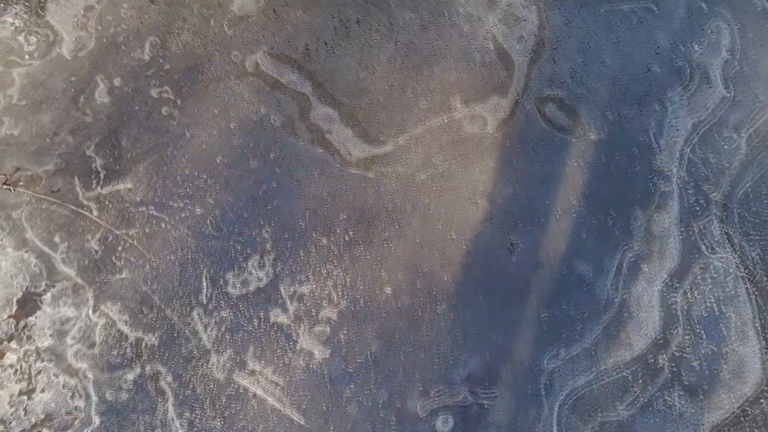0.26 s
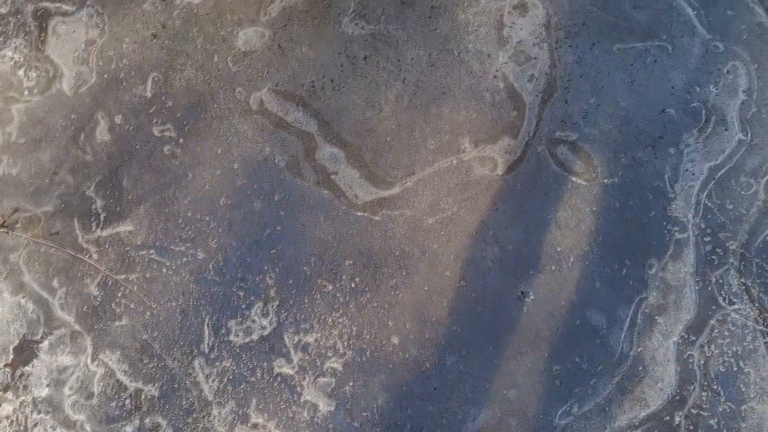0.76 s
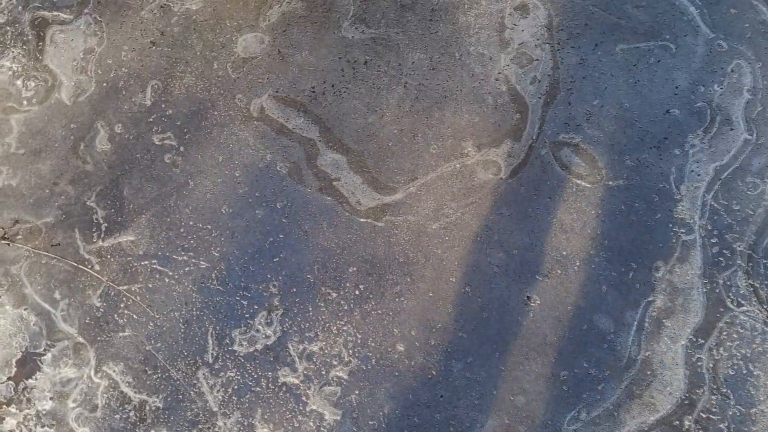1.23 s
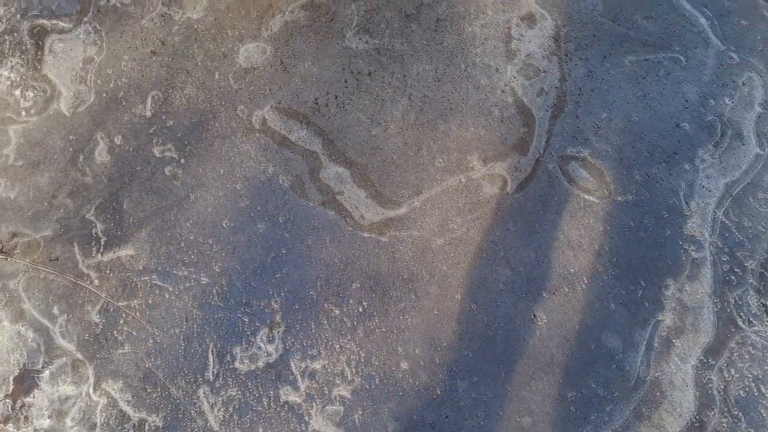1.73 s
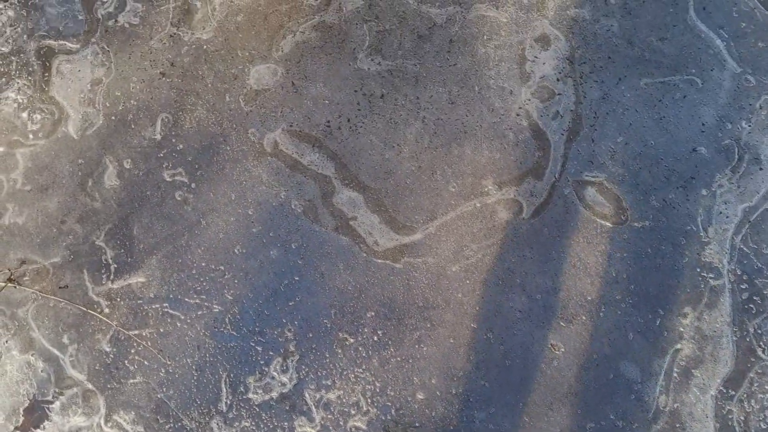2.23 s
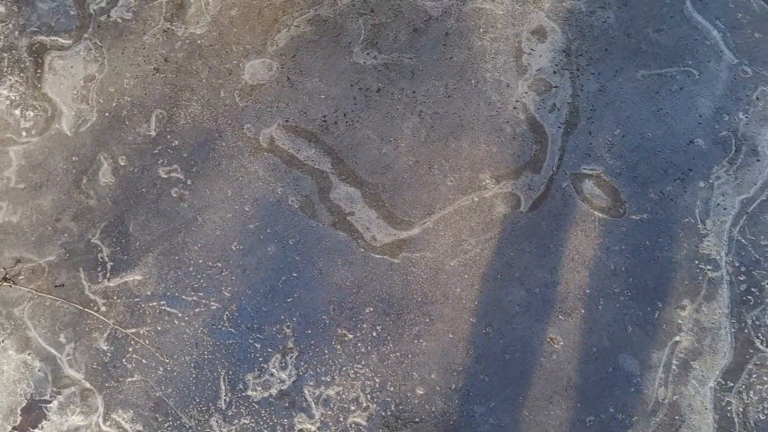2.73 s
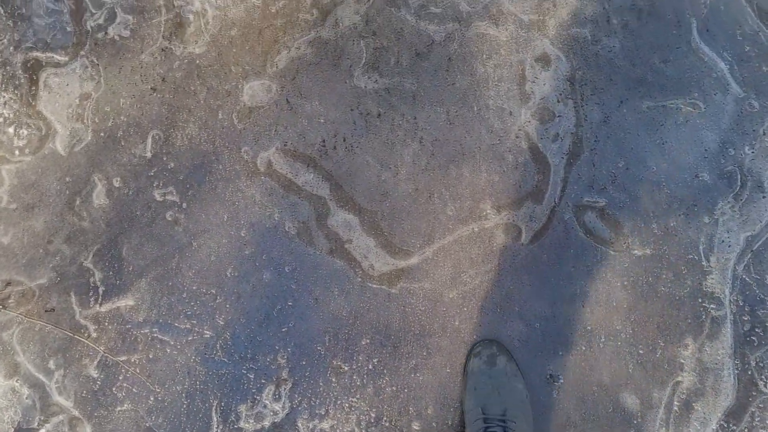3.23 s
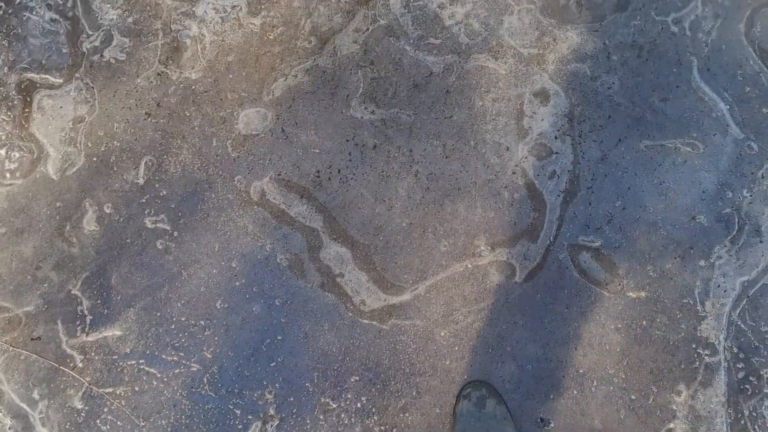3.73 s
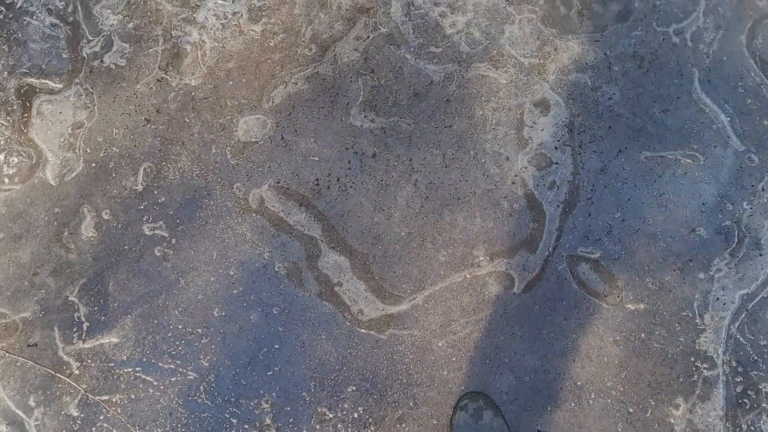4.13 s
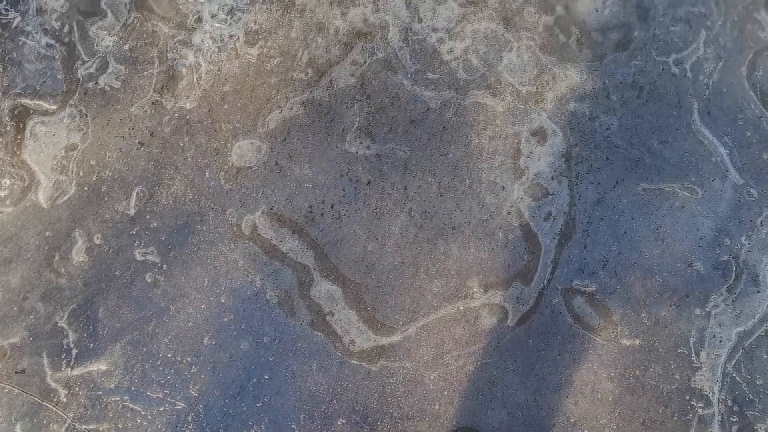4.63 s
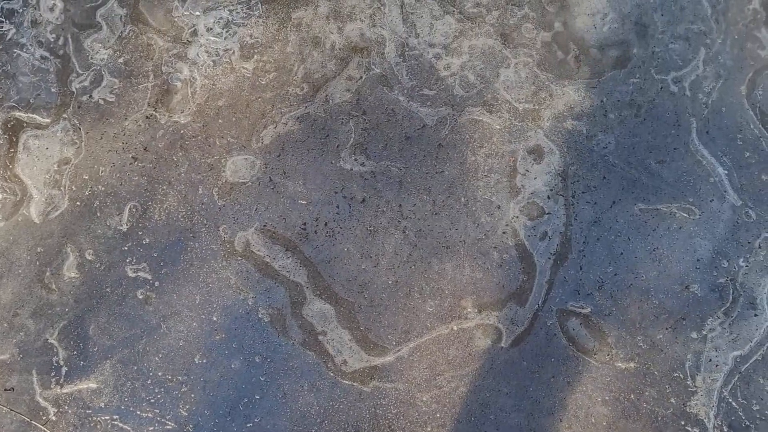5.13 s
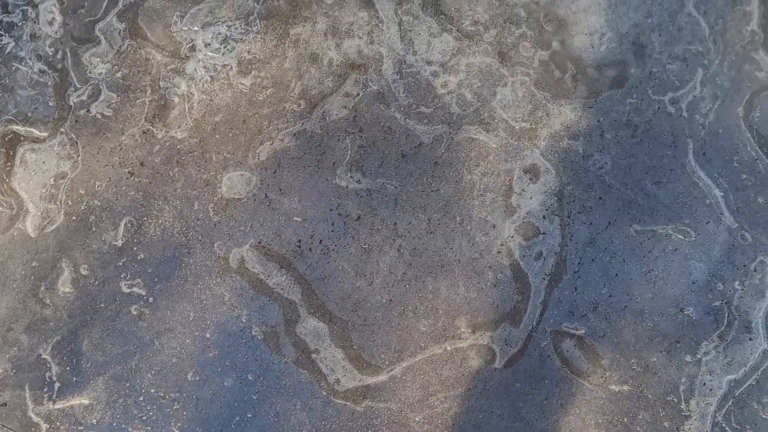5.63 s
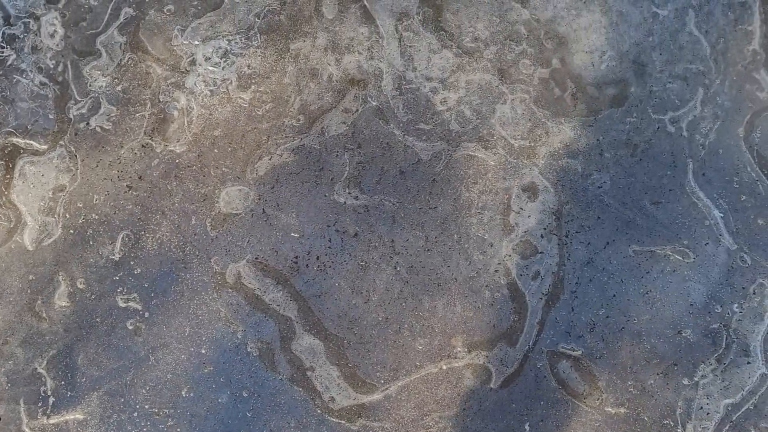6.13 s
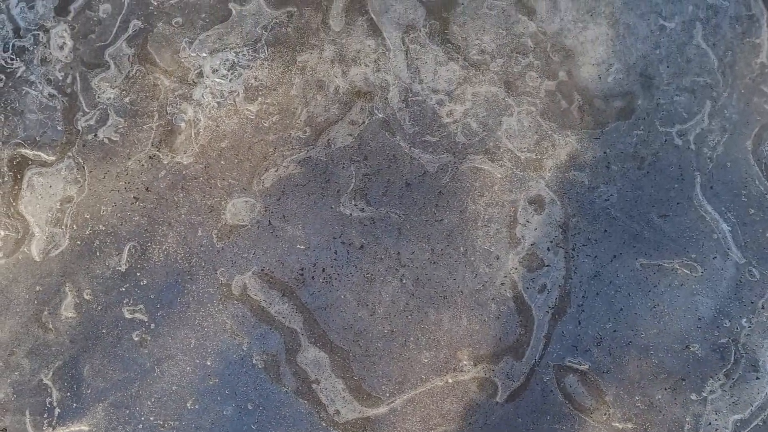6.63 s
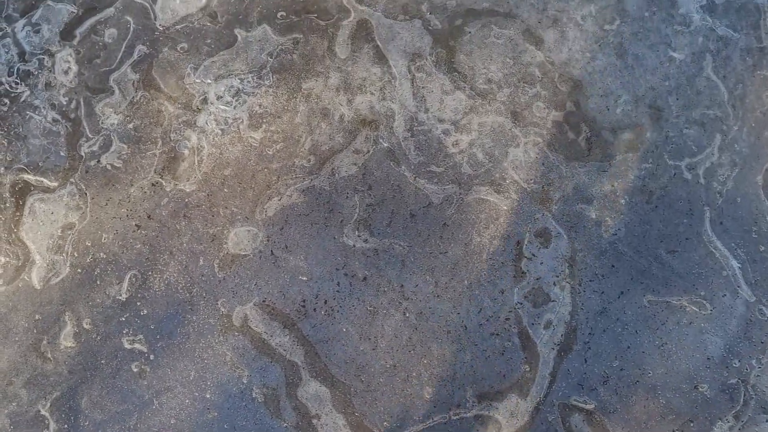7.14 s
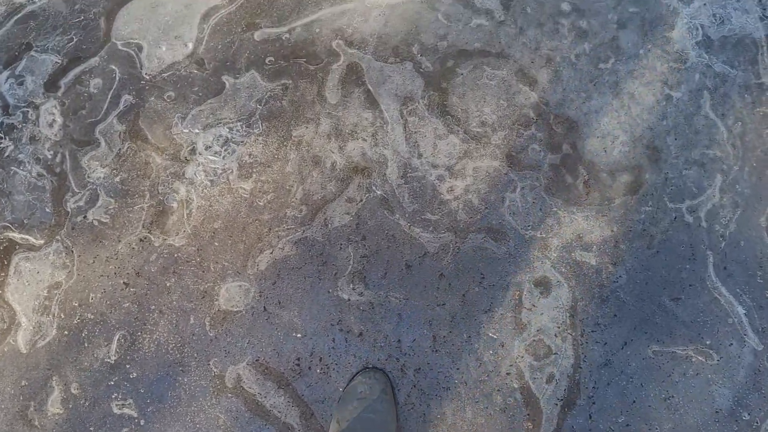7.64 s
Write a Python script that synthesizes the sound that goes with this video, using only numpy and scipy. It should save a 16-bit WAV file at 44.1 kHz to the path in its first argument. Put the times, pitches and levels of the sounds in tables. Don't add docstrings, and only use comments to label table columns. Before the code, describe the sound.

Close to a hand-held phone outdoors, a boot breaks thin puddle ice. Sparse ticks and soft low creaks come first, then a sharp cluster at two seconds and a stronger, louder one just after three. A quiet gap follows, then longer crackling and grinding from the middle onward, one last heavy break near seven seconds, and fading small ticks. Faint far traffic rumbles beneath.

```python
import sys
import numpy as np
from scipy import signal
from scipy.fft import rfft, irfft
from scipy.io import wavfile
from scipy.ndimage import uniform_filter1d

SR = 44100
rng = np.random.default_rng(int(sys.argv[2]) if len(sys.argv) > 2 else 0)


def put_to_file(sound):
    columns = np.atleast_2d(sound).T
    safe = np.clip(columns, -1, 1)
    whole_steps = np.round(safe * 32767)
    wavfile.write(sys.argv[1], SR, whole_steps.astype(np.int16))


def boost(x):
    u = np.asarray(x, float) / 20
    return 10 ** u


N = 347067

# start in seconds, crack peak in dB, thud in dB re crack,
# snap in dB re crack, knock in Hz.
TOE_BREAKS = [(0.767, -46, 11, -9, 640), (0.8987, -22.5, -1.5, -6.5, 450), (1.0809, -43.5, 12, -1.5, 345),
              (1.777, -60.5, 15, -10.5, 540), (2.0054, -20, -2.5, -1, 402), (2.0725, -32.5, -2, -7.5, 630),
              (2.1335, -23, 0.5, -7, 666), (2.1466, -32, -16.5, -7, 440), (2.167, -19.5, -4, -4, 620),
              (2.1887, -26.5, -5, -0.5, 560), (2.1998, -27.5, -7.5, -6.5, 560)]
STAMP_BREAKS = [(2.8458, -28, -2, -2, 700), (2.847, -45, 9.5, -14.5, 1040), (3.0416, -39, 4.5, -6, 221),
                (3.094, -14, -12.5, -12, 1290), (3.174, -21.5, -6, -8.5, 1470),
                (3.2424, -24.5, -6.5, -3, 240), (3.261, -20.5, -8, -3.5, 577), (3.2913, -15, -1, -9.5, 598),
                (3.3254, -44, -8, 7.5, 1490), (3.3341, -19, -5, -14, 551), (3.3428, -24, -3, -1.5, 453),
                (3.371, -32, -7.5, -3.5, 403), (3.405, -22.5, -3.5, -9, 560), (3.4279, -32, 1, -4, 540),
                (3.44, -14.5, -4.5, -7.5, 630), (3.505, -25.5, -6, -3.5, 553),
                (3.5224, -30.5, -26, -6.5, 1500), (3.606, -22.5, -8, -3, 870)]
LEAN_BREAKS = [(4.6506, -25, -2.5, -1, 560), (4.6644, -21.5, -3.5, -7, 1640), (4.678, -25.5, -7.5, -9, 560),
               (4.7068, -18.5, -7.5, -3.5, 534), (4.7193, -28.5, -2, -6, 300), (4.7479, -25.5, -6, -4, 516),
               (4.754, -29.5, -25, 4.5, 550), (4.76, -28, -3.5, -3, 540), (4.8179, -29, -1, 2, 540),
               (4.908, -43, 3.5, 1.5, 674), (4.9486, -28.5, -11, 5.5, 235), (4.9705, -19, -12, -5, 423),
               (4.9773, -33, 0, -4.5, 447), (4.99, -27, 0.5, -3, 610), (5.155, -31, -2, -7, 620),
               (5.162, -25, -8, -1, 1150)]
GRIND_BREAKS = [(5.346, -30, -9, -1, 533), (5.4736, -29.5, -11, -3, 840), (5.613, -29, -5, -1, 485),
                (5.6835, -29.5, -8, -3.5, 610), (5.73, -36.5, -4, -2, 790), (5.791, -23, -1.5, -7.5, 830),
                (5.8035, -26, -39, -1, 930), (5.8373, -43, 6, -4, 593), (5.851, -27.5, -7, -2.5, 910),
                (5.8575, -21, -9.5, -7, 930), (5.8666, -25, -4.5, -3.5, 680), (5.8868, -41.5, 5, 12, 560),
                (5.8965, -27.5, -10, -25.5, 1200), (5.916, -26.5, -4.5, -1.5, 910),
                (5.926, -34, -9, -5.5, 1390), (5.947, -29.5, -23, -2, 680), (5.9568, -31.5, -9, -1, 565),
                (5.968, -25, -9, -5.5, 560), (6.0167, -22.5, -4, -14, 532), (6.0705, -29.5, -18, 1.5, 590),
                (6.0918, -29, -1.5, 1.5, 560), (6.3106, -26.5, -6.5, -14.5, 1190),
                (6.3384, -33.5, -3, 5, 1380)]
LAST_BREAKS = [(6.8186, -43.5, 10, 16.5, 597), (6.8413, -38.5, 10.5, 8, 600), (6.861, -21.5, 1, -4, 416),
               (6.8892, -24, 6.5, 5.5, 544), (6.899, -17.5, -32, -12, 640), (6.938, -31, 2, 6, 545),
               (6.9516, -27.5, -7, -17, 560), (6.9798, -34.5, 3.5, 5, 560), (6.9889, -26, -3, -5, 550),
               (7.0087, -26, -26, -5, 1480), (7.016, -24.5, -2, -0.5, 520), (7.038, -28, -6.5, -0.5, 580),
               (7.061, -33, -39, 0, 550), (7.068, -33.5, -4, 2.5, 920)]
# start in seconds, crack peak in dB, snap in dB re crack.
TICKS = [(0.069, -53.5, -1), (0.2067, -35, -6.5), (0.317, -54, -1), (0.3894, -53, -3),
         (0.4312, -30.5, -12.5), (0.4488, -39.5, -1), (0.6268, -35.5, -1), (0.7051, -34, 0),
         (0.8831, -54, 1), (0.8936, -37.5, 5.5), (1.1718, -63, 7), (0.9853, -48.5, -3.5),
         (1.933, -54, -3), (1.988, -38.5, 2), (2.0601, -34.5, 0.5), (2.1095, -42, 6.5),
         (2.263, -49, -3), (2.302, -42.5, -0.5), (2.3191, -36, -6), (2.394, -51, 1),
         (2.432, -34, 3.5), (2.7943, -40.5, 4.5), (2.938, -47.5, 2), (2.977, -46, 5),
         (3.0063, -40.5, -1), (3.497, -35, 0), (3.5338, -33, -1), (3.6366, -29.5, -1),
         (3.758, -55, 5.5), (4.0691, -48, 6),
         (4.853, -44.5, 2), (4.8697, -32, 2), (4.8807, -33.5, -2), (4.927, -33.5, -2),
                (5.064, -46, 1.5), (5.123, -45.5, 10), (5.1354, -39, -2), (5.2, -42, 4),
                (5.228, -44.5, 4.5), (5.258, -43.5, 1), (5.309, -48, 4.5), (5.361, -45.5, 8),
                (5.397, -37, 1), (5.426, -37, 0.5), (5.5126, -42, 0.5), (5.5332, -44.5, 4.5),
                (5.559, -51, 12), (5.5798, -43, 5.5), (5.643, -42, 2), (5.665, -35, -1.5), (5.76, -58, 4),
                (5.7762, -33.5, 1), (5.905, -34, -10), (6, -52, 2), (6.033, -37, 7), (6.0474, -32.5, 3),
                (6.133, -38, 1), (6.173, -41.5, 4),
         (6.2032, -41, 6), (6.2105, -38.5, -0.5), (6.2464, -46.5, 4), (6.322, -31, -4),
              (6.348, -31.5, -4), (6.4508, -49.5, 6), (6.5122, -52.5, 7), (6.608, -45.5, 7),
              (6.7733, -62, 12), (6.798, -39.5, 0.5), (7.089, -37.5, 3), (7.103, -39, 4),
              (7.1165, -47.5, -1), (7.1544, -46, 1.5), (7.173, -42, 0), (7.2003, -39.5, 1),
              (7.223, -47.5, 8.5), (7.2799, -59.5, 15), (7.335, -44, -2), (7.3588, -45.5, 8),
              (7.3903, -36, 2.5), (7.4616, -49, 4), (7.4742, -56.5, 12.5), (7.601, -50, 6.5),
              (7.623, -49.5, 3), (7.651, -51, 0), (7.729, -57, 8), (7.742, -63, 13), (7.81, -52, 3),
              (7.834, -46, 3.5)]
# start in seconds, crack peak in dB, snap in dB re crack.
SLIVERS = [(0.081, -55, 1), (0.0994, -56, -3), (0.1322, -56.5, 0), (0.2515, -69, 16), (0.3456, -59, -1),
           (0.381, -52.5, -3), (0.413, -56, 6), (0.4873, -63, 1), (2.126, -35, 0), (0.8161, -67, 3),
           (1.2226, -63, -3), (4.553, -68, 8), (1.8163, -72, 3), (1.9181, -54, -4), (1.96, -51, 1),
           (2.2826, -45, -2), (2.7743, -54, 4.5), (2.825, -55, 3), (3.717, -61, -3), (3.8487, -62.5, 7),
           (4.1465, -69.5, 6.5), (4.275, -72, 12), (5.101, -55, 7), (5.386, -52, 5), (6.112, -44, 10.5),
           (6.1657, -47.5, 12), (6.2389, -53, 7), (6.2536, -58, 9), (6.3, -47, -2), (6.315, -39.5, 11),
           (6.4193, -58, 4), (6.5735, -64.5, 9), (6.653, -62, 0), (6.69, -59, 6), (6.7386, -63, 2),
           (7.429, -56, 4), (7.443, -47.5, -4), (7.544, -59, 5), (7.5726, -54, -1), (4.638, -53, 0),
           (4.808, -42, 2), (4.8133, -42, 2)]
# start in seconds, crack peak in dB, snap in dB re crack.
STROKES = [(1.775, -55.5, -3), (2.0045, -27, -2), (2.134, -30, -4), (2.432, -39, -2), (3.2916, -18, -5),
           (3.4401, -29, -15), (4.6647, -30, -2), (4.969, -24, 9), (5.199, -53, 10), (5.7931, -26, -5),
           (6.0165, -32, -6), (6.862, -23.5, -4), (6.899, -26, -5), (5.8378, -33, -2), (4.979, -32, 2)]
# frequency in Hz, density in dB per Hz.
ICE_COLOUR = [(410, -61), (700, -6), (1120, -6), (1480, 0.5), (1660, -8), (2160, -9), (4050, -7),
              (6740, -7.5), (8530, -17), (15200, -12.5), (16000, -11)]
# frequency in Hz, level in dB, t60 in seconds.
PLATE_MODES = [(133.3, -2.5, 0.12), (252, 5.5, 0.066), (396, 5.5, 0.07), (560, 4, 0.11), (680, -6, 0.035),
               (910, -0.5, 0.11)]
# start in seconds, peak in dB, pitch in
# Hz, t60 in seconds.
LOOSE_SLABS = [(0.485, -34, 363, 0.059), (0.512, -32, 250, 0.045), (2.011, -17, 348, 0.05),
               (2.026, -22, 312, 0.05), (2.168, -20, 638, 0.06), (2.192, -26, 576, 0.055),
               (2.855, -22, 978, 0.054), (3.447, -20, 382, 0.042), (3.459, -18, 296, 0.084),
               (4.662, -18, 466, 0.058), (4.686, -24, 270, 0.047), (3.403, -24, 570, 0.04),
               (4.746, -21, 378, 0.037), (4.769, -21, 466, 0.046), (4.818, -18, 408, 0.047),
               (3.446, -14, 560, 0.04), (4.994, -28, 570, 0.043), (5.728, -20, 770, 0.031),
               (5.792, -22, 804, 0.045), (5.836, -20, 570, 0.046), (5.865, -19, 390, 0.07),
               (5.894, -25, 647, 0.04), (6.017, -22, 581, 0.067), (6.097, -15.5, 239, 0.043),
               (6.308, -20, 1235, 0.063), (6.86, -17, 620, 0.085), (6.8908, -6, 590, 0.016),
               (7.017, -25, 530, 0.068),
               (1.082, -22, 398, 0.021), (1.081, -26, 900, .025), (3.2908, 0.5, 420, .011),
              (2.0039, -11.5, 480, 0.012), (2.008, -16, 425, .05), (2.02, -23, 380, .05),
              (3.074, -31, 252, .07), (3.095, -23, 1400, .025), (3.176, -25, 1450, .02),
              (3.294, -18.5, 250, .07), (3.31, -25.5, 404, .05), (3.442, -15.5, 142, .09),
              (3.44, -18.5, 2190, .025), (6.312, -10, 1310, .03)]
# start in seconds, hold in seconds, shard crackle in dB, boot weight in dB.
PUSHES = [(0.178, 0.11, -61.5, -52.5), (0.442, 0.16, -57, -41.5), (0.683, 0.13, -64, -46.5),
          (0.915, 0.0028, -60, -34), (1.079, .03, -63.5, -52), (1.77, 0.0072, -93, -48),
          (1.919, 0.027, -67, -58), (2.009, 0.012, -55, -31.5), (2.141, 0.034, -42, -34),
          (2.288, 0.022, -59, -55), (2.474, 0.029, -72, -68), (2.804, .02, -62, -56),
          (2.912, 0.075, -65, -62), (3.07, 0.084, -50.5, -32), (3.291, 0.019, -37.5, -28),
          (3.444, 0.015, -42.5, -30.5), (3.602, 0.012, -46.5, -51), (3.733, 0.14, -64.5, -60),
          (4.054, 0.009, -72, -53.5), (4.702, 0.16, -49, -44.5), (4.894, 0.12, -48, -46.5),
          (5.146, 0.021, -45, -43), (5.366, 0.33, -52, -71), (5.797, 0.14, -39.5, -44),
          (5.93, 0.18, -40.5, -46.5), (6.312, 0.013, -48, -53), (6.423, 0.3, -61, -59.5),
          (6.866, 0.17, -33, -37.5), (7.116, 0.43, -58, -47), (7.517, 0.25, -62, -51)]
# frequency in Hz, width in Hz, level in dB.
POCKET_MODES = [(118, 52, -1), (251, 110, -3)]
# start in seconds, length in seconds, level in dB,
# upper resonance in Hz.
DRAGS = [
    (0.484, 0.087, -48, 2260),
    (7.123, 0.062, -45.5, 2300),
    (7.21, .25, -48, 2300),
]
# share of upper resonance, level in dB, relative width.
CRUMB_MODES = [(.15, 6, .5), (.3, -2.5, .4), (.6, 1, .3), (1., -6, .2)]
# start in seconds, length in seconds, level in dB.
SEEPS = [
    (3.68, .33, -73),
    (6.42, .37, -69),
]
# start in seconds, length in seconds, level in dB.
RUSTLES = [
    (1.5, 0.05, -85),
    (3.66, 0.22, -85),
    (4.29, 0.32, -81.5),
]
# frequency in Hz, left minus right in dB.
PORT_SHADE = [(60, 9.5), (110, 0), (200, 0), (380, 3), (700, -1), (1290, 0.5), (2380, -5), (4400, 3.5),
              (8120, -1.5), (15000, -13.5)]
# frequency in Hz, density in dB per Hz.
TRAFFIC_COLOUR = [(30, -33), (42, -7.5), (58, -2), (100, -7), (150, -12.5), (220, -21.5), (450, -39),
                  (800, -34.5), (1200, -43)]
# frequency in Hz, density in dB per Hz.
AIR_COLOUR = [(1200, -2.5), (1640, -12), (3000, -26), (4500, -20.5), (5400, -30.5), (6600, -15),
              (8200, -27.5), (16000, -19.5)]

BREAK_S, SPAN = 0.005, 4096
PORT_LAG_S = 0.00048


def curve(points, hz):
    p = np.array(points)
    return boost(np.interp(np.log(hz + 1), np.log(p[:, 0]), p[:, 1]))


def band(hz, lo_hz, hi_hz):
    return 1 / np.sqrt((1 + (lo_hz / (hz + 1)) ** 6) * (1 + (hz / hi_hz) ** 6))


def shape(x, gain):
    return irfft(rfft(x) * gain, x.shape[-1])


def level(x, db):
    return x * boost(db) / np.sqrt(np.mean(x ** 2))


def crest(x):
    return x / np.sqrt(uniform_filter1d(x ** 2, size=64, axis=-1).max(axis=-1, keepdims=True))


def walk(rate_hz):
    hold = int(SR / rate_hz)
    steps = np.repeat(rng.standard_normal(N // hold + 1), hold)
    return 1.328 * uniform_filter1d(uniform_filter1d(steps, hold), hold)[:N]


def ports(near, loose, hz, lag_s, share):
    bend = hz ** 2 / (hz ** 2 + 1000.0 ** 2)
    share = np.clip(share * bend, 0, 1)
    delayed = shape(near, np.sqrt(1 - share) * np.exp(-2j * np.pi * hz * lag_s * bend))
    left = delayed + shape(loose, np.sqrt(share))
    shade = np.sqrt(curve(PORT_SHADE, hz))
    return np.array([shape(left, shade), shape(near, 1 / shade)])


def splinters(t, run_s, tail_db, lead_db, hard_db):
    rupture_s, rupture_db = 0.0008, 21
    size = (len(run_s), SPAN)
    jerks = rng.standard_normal(size) * boost(4.78 * np.minimum(rng.exponential(size=size), 5))
    jerks[:, int((BREAK_S + rupture_s) * SR)] += boost(rupture_db + hard_db)
    late = np.maximum(t - BREAK_S, 0)
    creep = boost(lead_db) * np.exp((t - BREAK_S) / 0.00088)
    scatter = np.exp(-late / 0.027) + boost(-6.5) * np.exp(-late / 0.0069)
    fading = np.exp(-late / run_s) + boost(tail_db) * scatter
    return jerks * np.where(t < BREAK_S, creep, fading)


def thuds(t, knock_hz):
    hz, db, t60_s = np.transpose(PLATE_MODES)
    chance = rng.standard_normal((len(knock_hz), 3, len(hz)))
    late = np.maximum(t - BREAK_S - 0.0005, 0)
    sag = late + 0.00086 * (1 - np.exp(-late / 0.0039))
    out = boost(11) * np.sin(2 * np.pi * knock_hz * sag) * np.exp(-np.log(1000) * late * knock_hz / 21.0)
    for k in range(len(hz)):
        pitch_hz = hz[k] * np.exp(0.1 * chance[:, 0, [k]])
        ring = np.sin(2 * np.pi * pitch_hz * sag) * np.exp(-np.log(1000) * late / t60_s[k])
        out = out + boost(db[k] + 0.77 * chance[:, 2, [k]]) * np.sign(chance[:, 1, [k]]) * ring
    return out


def fractures(rows, clean_db=0):
    s, db, thud_db, snap_db, knock_hz = np.transpose(rows)[:, :, None]
    t, hz = np.arange(SPAN) / SR, np.fft.rfftfreq(SPAN, 1 / SR)
    chance = rng.standard_normal((len(s), 3))
    run_s = 0.0044 * boost(0.031 * (db + 32.0) + 3.2 * chance[:, [0]])
    spread = np.exp(-2j * np.pi * 0.0621 * np.sqrt(hz)) * curve(ICE_COLOUR, hz)
    octave = np.log2(hz + 1)
    comb = np.cos(5 * octave + 9 * chance[:, [2]]) + np.cos(11 * octave + 9 * chance[:, [1]])
    spread = spread * boost(2.5 * comb)
    thud = crest(thuds(t, knock_hz)) * boost(thud_db - 2.5)
    body = band(hz, 150, 1700) * (0.35 + 1 / (1 + 1j * (hz - knock_hz) / (0.15 * knock_hz)))
    tilt = boost(0.048 * (snap_db - thud_db) * np.log2((hz + 1) / 2500))
    crack_gain = tilt * spread * band(hz, 760, 4700)
    snap_gain = spread * band(hz, 6800, 12000 + 200 * clean_db)
    pair = []
    for _ in range(2):
        rumble = splinters(t, 2.2 * run_s, tail_db=-13.5, lead_db=-14.5, hard_db=clean_db - 6.5)
        crack = splinters(t, run_s, tail_db=-14.0, lead_db=4.0 - clean_db, hard_db=clean_db)
        snap = splinters(t, 0.44 * run_s, tail_db=-21.0, lead_db=-6.0 - clean_db / 2, hard_db=clean_db)
        rumble = crest(shape(rumble, body)) * boost(thud_db - 2.5)
        crack = crest(shape(crack, crack_gain)) * boost(-2.0)
        snap = crest(shape(snap, snap_gain)) * boost(snap_db - 2.5)
        pair.append(crack + snap + thud + rumble)
    lean_db = 1.2 * chance[:, [1]]
    heard = ports(*pair, hz, PORT_LAG_S + 0.00004 * chance[:, [2]], share=0.95)
    heard = heard * boost(db + np.array([lean_db, -lean_db]))
    out = np.zeros((2, N + SPAN))
    starts = np.maximum((s[:, 0] - BREAK_S - 0.0006) * SR, 0).astype(int)
    for k, start in enumerate(starts):
        out[:, start:start + SPAN] += heard[:, k]
    return out[:, :N]


def slabs(hz):
    slab_db, attack_s, sag = -8, 0.0012, 0.045
    t, out = np.arange(SPAN) / SR, np.zeros(N + SPAN)
    for s, db, pitch_hz, t60_s in LOOSE_SLABS:
        phase = 2 * np.pi * pitch_hz * (t + sag * 0.0037 * (1 - np.exp(-t / 0.005)))
        decay = np.exp(-np.log(1000) * t / np.clip(t60_s, 0.01, 0.09))
        start = int(s * SR)
        out[start:start + SPAN] -= boost(db + slab_db) * (1 - np.exp(-t / attack_s)) * decay * np.sin(phase)
    ring = out[:N]
    return ports(ring, ring, hz, PORT_LAG_S, share=0)


def load():
    rise_db_per_s, fall_db_per_s, landing_db_per_s = 297.5, 190, 699.5
    creep_db, creep_db_per_s, weight_steepness = -11, 59, 1.4
    groan_re_crackle_db, groan_re_weight_db = -2, -13.5
    rest_crackle_db, rest_groan_db, rest_weight_db = -103.5, -75, -54
    s, hold_s, crackle_db, weight_db = np.transpose(PUSHES)[:, :, None]
    t = np.arange(0, N + 64, 64) / SR
    early, late = np.maximum(s - t, 0), np.maximum(t - s - hold_s, 0)
    release = boost(-fall_db_per_s * late) + boost(creep_db - creep_db_per_s * late)
    push = boost(-rise_db_per_s * early) * release
    press = push ** weight_steepness * boost(-landing_db_per_s * early)
    crackle = np.sum((push * boost(crackle_db)) ** 2, axis=0)
    weight = np.sum((press * boost(weight_db)) ** 2, axis=0)
    groan = crackle * boost(2 * groan_re_crackle_db) + weight * boost(2 * groan_re_weight_db)
    powers = (crackle + boost(2 * rest_crackle_db), groan + boost(2 * rest_groan_db),
              weight + boost(2 * rest_weight_db))
    return (np.interp(np.arange(N) / SR, t, 10 * np.log10(p)) for p in powers)


def shards(crackle_db, groan_db, hz):
    clusters = boost(2.0 * walk(60) + 2.5 * walk(250))
    sizes = boost(4.4 * np.minimum(rng.exponential(size=N), 5.5)) * clusters
    n = np.arange(600)
    smear = np.exp(-n / (0.00077 * SR)) + 0.035 * np.exp(-n / (0.0073 * SR))
    ticks = rng.standard_normal((2, N)) * np.sqrt(signal.fftconvolve(sizes ** 2, smear)[:N])
    crackle = level(shape(ticks, curve(ICE_COLOUR, hz) * band(hz, 1400, 20000)), -3.5) * boost(crackle_db)
    modes = sum(boost(db) / np.hypot(1, (hz - f) / (0.39 * f)) for f, db, _ in PLATE_MODES)
    ring = modes * band(hz, 330, 1900) * np.hypot(1, hz / 900)
    grind = rng.standard_normal((2, N)) * boost(2.0 * walk(40) + 2.0 * walk(150))
    groan = level(shape(level(ticks, -6.0) + grind, ring), -5.0) * boost(groan_db)
    return ports(*(crackle + groan), hz, PORT_LAG_S, share=1.0)


def boot(weight_db, hz):
    modes = sum(boost(db) / np.hypot(1, 2 * (hz - f) / width_hz) for f, width_hz, db in POCKET_MODES)
    drum = shape(rng.standard_normal(N) * boost(3.0 * walk(25)), modes * band(hz, 38, 540))
    hum_hz = POCKET_MODES[-1][0] * (1 + 0.0401 * walk(13))
    hum = np.sin(2 * np.pi * np.cumsum(hum_hz) / SR) * boost(0.79 * (weight_db + 24.5))
    return (level(drum, -6.5) + hum) * boost(weight_db)


def drags(hz):
    t, out = np.arange(N) / SR, 0
    slips_db = 3.0 * np.minimum(rng.exponential(size=N), 4) + 1.8 * walk(90)
    grains = rng.standard_normal((2, N)) * boost(slips_db)
    for s, length_s, db, top_hz in DRAGS:
        modes = sum(boost(mode_db) / np.hypot(1, ((hz - k * top_hz) / (width * k * top_hz)) ** 2)
                    for k, mode_db, width in CRUMB_MODES)
        fade = boost(-900 * np.maximum(s - t, 0) - 300 * np.maximum(t - s - length_s, 0))
        out = out + level(shape(grains, modes * band(hz, 250, 2800)), db) * fade
    return ports(*out, hz, PORT_LAG_S, share=0.6)


def seep(hz):
    seep_hz, width_hz = 2030, 140
    t = np.arange(N) / SR
    whistle = 1 / np.hypot(1, ((hz - seep_hz) / width_hz) ** 2)
    hiss = level(shape(rng.standard_normal((2, N)), whistle), 0)
    return hiss * sum(boost(db - 300 * np.maximum(np.maximum(s - t, t - s - length_s), 0))
                      for s, length_s, db in SEEPS)


def sleeve(hz):
    t = np.arange(N) / SR
    rubbing = rng.standard_normal((2, N)) * boost(2.0 * walk(20))
    hiss = level(shape(rubbing, band(hz, 5900, 7600) + 0.32 * band(hz, 4000, 4900)), 0)
    return hiss * sum(boost(db - 900 * np.maximum(s - t, 0) - 60 * np.maximum(t - s - length_s, 0))
                      for s, length_s, db in RUSTLES)


def field(hz):
    air_db, field_db = -39.5, -49.5
    traffic = curve(TRAFFIC_COLOUR, hz) * band(hz, 36, 9000)
    colour = np.where(hz < 1200, traffic, curve(AIR_COLOUR, hz) * boost(air_db))
    mid, side = shape(rng.standard_normal((2, N)), colour)
    side = shape(side, np.clip(hz / 700, 0.3, 1))
    pair = np.array([mid + side, mid - side])
    out = 0
    for lo_hz in 20 * 2.0 ** np.arange(0, 10, 0.5):
        half_octave = (hz >= lo_hz) & (hz < 2 ** 0.5 * lo_hz)
        swell_db = 2.4 if lo_hz < 1000 else 2.8
        out = out + shape(pair, half_octave) * boost(swell_db * walk(1.4) + 0.43 * walk(13.0))
    lean = curve([(30, 1.5), (400, -1.5), (5000, 11.0), (15000, -3.5)], hz)
    return level(np.array([shape(out[0], lean), shape(out[1], 1 / lean)]), field_db)


def scene():
    hz = np.fft.rfftfreq(N, 1 / SR)
    crackle_db, groan_db, weight_db = load()
    ticks = [(s, db, -9, snap_db, 600) for s, db, snap_db in TICKS]
    slivers = [(s, db, -18, snap_db, 600) for s, db, snap_db in SLIVERS]
    strokes = [(s, db, -24, snap_db, 600) for s, db, snap_db in STROKES]
    breaks = TOE_BREAKS + STAMP_BREAKS + LEAN_BREAKS + GRIND_BREAKS + LAST_BREAKS
    ice = fractures(breaks + ticks) + fractures(slivers) + fractures(strokes, clean_db=16)
    ice = ice + slabs(hz) + shards(crackle_db, groan_db, hz)
    boot_side_db = -13
    drum = boot(weight_db, hz) + boot(weight_db + boot_side_db, hz) * np.array([[1], [-1]])
    return ice + drum + drags(hz) + seep(hz) + sleeve(hz) + field(hz)


def top_cut(x):
    return signal.sosfilt(signal.butter(12, 17150, fs=SR, output="sos"), x)


def record(dry):
    mix = np.tanh(dry)
    for stop_db, top_hz in [(24, 15900), (50, 16600)]:
        mix = signal.sosfilt(signal.ellip(8, 0.2, stop_db, top_hz, fs=SR, output="sos"), mix)
    return top_cut(mix)


dry = scene()
out = record(dry)
put_to_file(out)
```